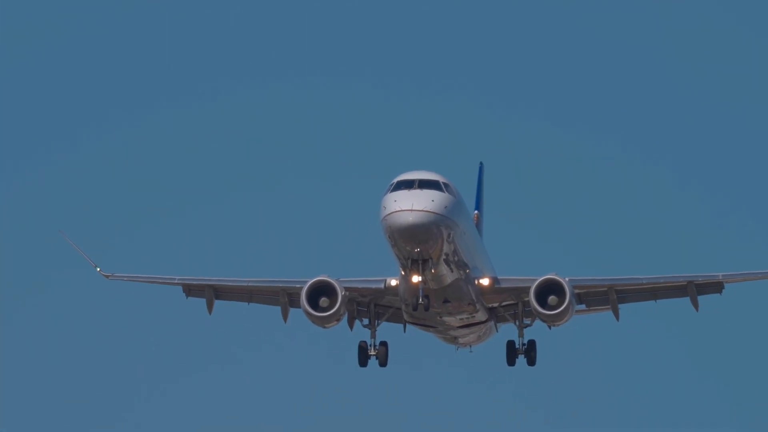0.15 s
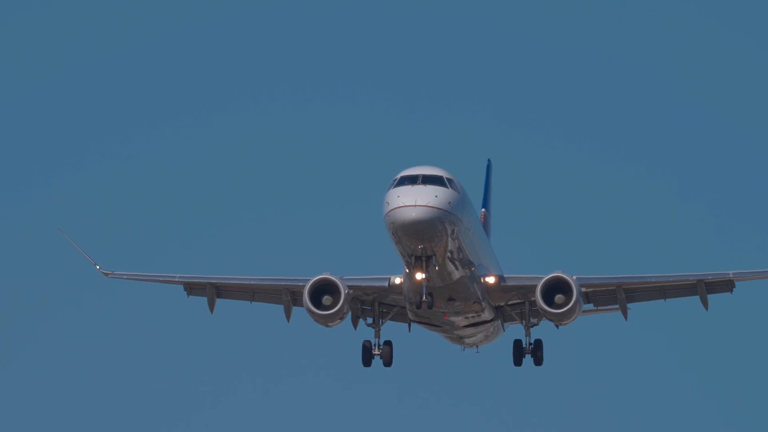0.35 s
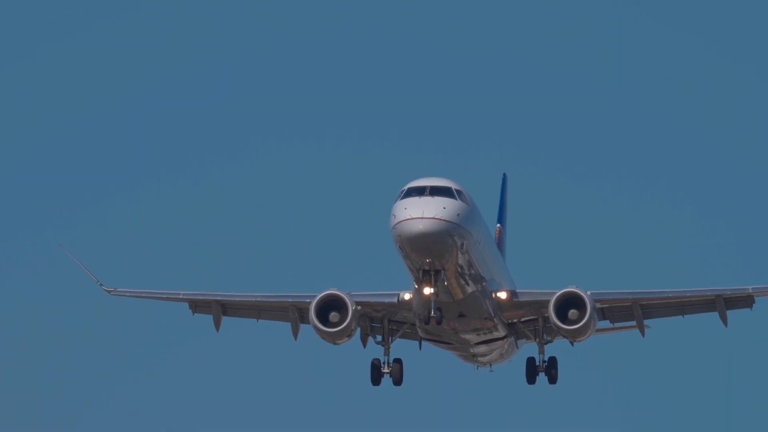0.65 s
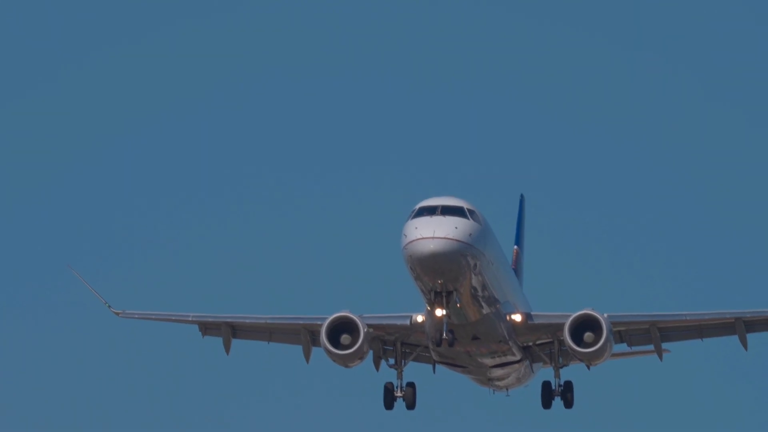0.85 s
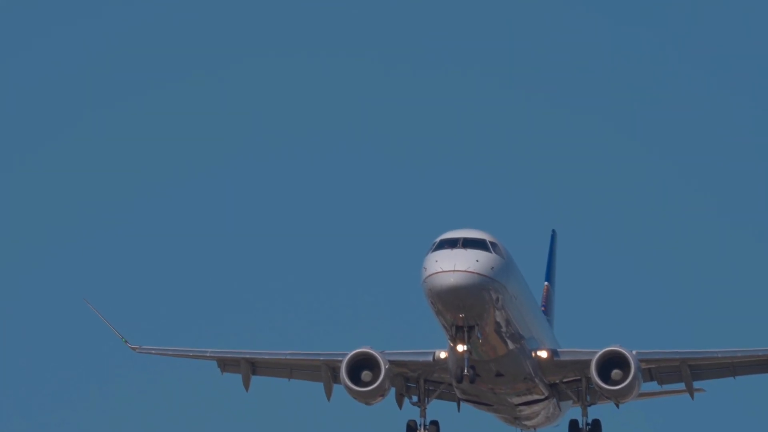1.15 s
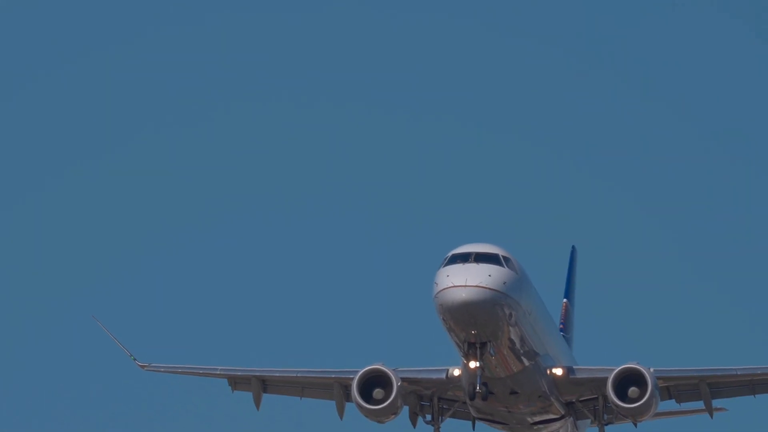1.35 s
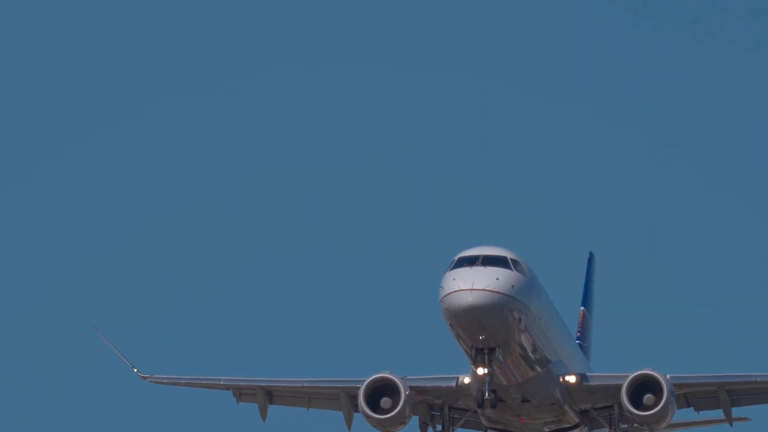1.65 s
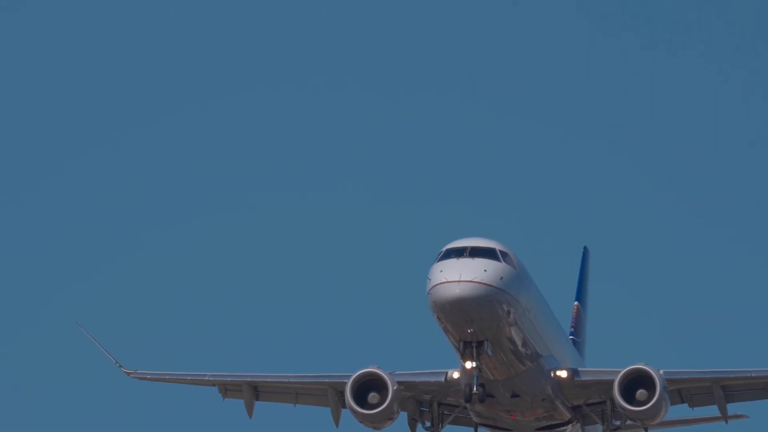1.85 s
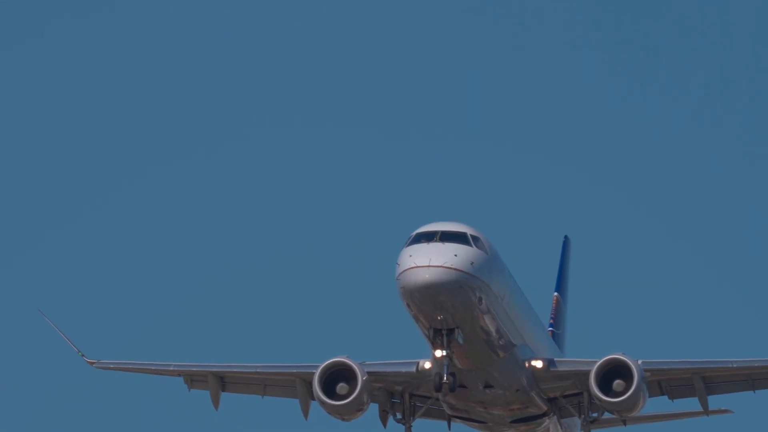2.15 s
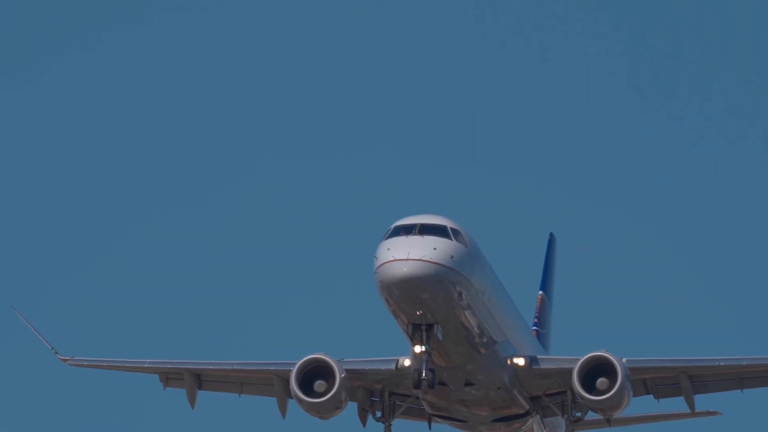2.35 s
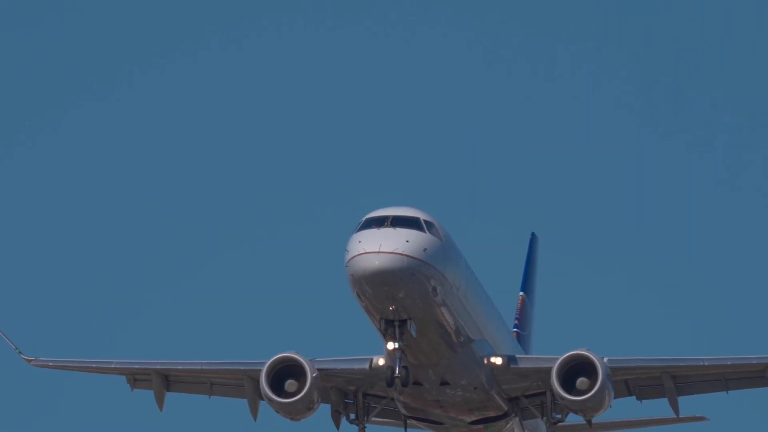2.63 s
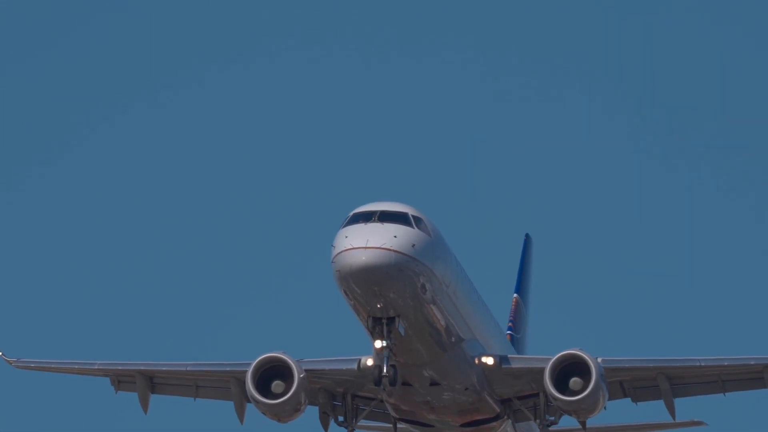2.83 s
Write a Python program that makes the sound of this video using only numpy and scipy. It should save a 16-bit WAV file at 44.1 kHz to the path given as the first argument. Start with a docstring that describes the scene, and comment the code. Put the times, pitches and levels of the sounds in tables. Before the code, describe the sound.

A jet airliner approaches outdoors, its soft broad roar starting wide and rightward. Low wind rumble buffets the microphone throughout; gusts flutter, thump and pop from 0.5 to 1.5 s, with sharp tearing near 1.3 s. A faint high hiss fades. Wind eases, with a brief gust near 1.9 s. From 2.1 s fan rush and wavering, slightly rising whine swell, more central, loudest at the end without passing.

```python
"""A jet airliner nears head-on to land: broad roar, growing fan rush, thin rising whine.
Roar and rush are shaped, patchy stereo noise; swells are sliding noise bands; whine and partials are wavering sines.
Gusts buffet the microphone: lumpy noise for rumble, flutter, bluster and tearing; single pulses for thumps and pops.
A faint high hiss, like wind in grass, is patchy noise that dies away over an even noise floor."""
import sys
import numpy as np
from scipy import signal
from scipy.fft import rfft, irfft, next_fast_len
from scipy.io import wavfile
from scipy.ndimage import uniform_filter1d, map_coordinates

SR = 44100
rng = np.random.default_rng(int(sys.argv[2]) if len(sys.argv) > 2 else 0)


def inscribe(sig):
    """Save sig as 16-bit PCM at rate SR to the path in sys.argv[1].

    A 1-D sig is mono; a 2-D sig holds one channel per row.
    Samples are clipped to [-1, 1] before scaling.
    """
    pcm = np.round(np.clip(np.atleast_2d(sig).T, -1, 1) * 32767)
    wavfile.write(sys.argv[1], SR, pcm.astype(np.int16))


N = 131859  # samples

# All spectra are relative: the noise is scaled to rms 1 before its level is applied.
# Jet levels are ahead of pan, width and balance.
# approach: t/s, then roar, fan rush, treble level/dB ahead of the trims
APPROACH_DB = [(0.0, -47.5, -53, -64), (0.61, -47, -52.5, -63), (0.7, -49.5, -50.5, -64),
               (1.15, -46.5, -50, -63), (1.26, -48, -49, -56.5), (1.38, -48.5, -48.5, -60.5),
               (1.56, -49, -46.5, -57.5), (1.78, -46.5, -46, -59.5), (1.95, -45.5, -48, -56.5),
               (2.12, -47, -42.5, -52.5), (2.36, -47.5, -39, -50), (2.5, -44.5, -42.5, -51.5),
               (2.8, -44, -40, -53), (2.9, -46, -37, -50), (2.99, -40, -43, -50.5)]
ROAR_TRIM_DB, RUSH_TRIM_DB, TREBLE_TRIM_DB = 3, 1.46, 1
# lower body of the roar: t/s, level/dB
BODY_LEVEL_DB = [(0, -53.5), (.35, -55.5), (1.0, -47.5), (1.55, -47.5), (1.85, -52.5), (2.05, -49),
                 (2.14, -43.5), (2.25, -49), (2.42, -48.5), (2.6, -47), (2.99, -61)]
# jet noise spectra: f/Hz, density/dB
ROAR_SPECTRUM_DB = [(40, -21), (150, -7.5), (400, -21.5), (540, -3.5), (720, -5.5), (980, 1.5),
                    (1150, -2.5), (1400, -2.5), (1750, -11.5), (2400, -26.5), (5000, -65)]
BODY_SPECTRUM_DB = [(150, -11.5), (330, -5), (450, -2.5), (620, -2.5), (740, 2), (900, -2), (1300, -37.5),
                    (3000, -64.5)]
RUSH_SPECTRUM_DB = [(700, -7.5), (1150, -7), (1450, 2.5), (1700, 0), (1900, 2.5), (2150, -1.5),
                    (2500, -4.5), (2900, -9.5), (3600, -60.5), (6000, -81)]
TREBLE_SPECTRUM_DB = [(1500, -36.5), (2300, -0.5), (2800, 3.5), (3400, 2.5), (4000, -6), (4700, -12.5),
                      (5500, -30.5), (7000, -70), (10000, -62.5)]
# jet noise ahead of the width: f/Hz, left-right correlation/1
JET_ALIKE = [(100, 0.57), (280, 0.25), (680, 0.85), (1100, 0.65), (1800, 0.85), (2900, 0.24), (5000, 0.62)]
# jet, on top of the pan: f/Hz, right over left/dB
JET_BALANCE_DB = [(150, -5), (420, -2), (700, 0), (1100, 2), (1800, 1), (2900, 0), (5000, 1.5)]
# jet between ports: f/Hz, left lead/rad
JET_LEAD_RAD = [(300, 0.43), (1200, -0.92), (1800, -0.64), (2400, -0.57), (3200, -1.2), (5000, -0.12)]
# whole jet: t/s, right over left/dB, side gain/dB; direct sound outgrows scattered
BEARING_DB = [(0, 5.5, 3.5), (.7, 3.5, 3.5), (1.5, 3, 0), (2.2, 2, -3), (2.99, 1.5, -9.5)]
# fan noise swells: t/s, half length/s, centre f/Hz, slide/(Hz/s), half width/Hz, level/dB
SWELLS = [(1.57, 0.16, 1920, 1, 139, -47), (2.451, 0.2, 1859, -300, 80.4, -43),
          (2.322, 0.1, 2490, -1, 220, -51), (2.349, .15, 1120, -200, 110.6, -47),
          (2.562, 0.18, 1415, 2.5, 201.5, -46), (2.86, 0.21, 1526, -300, 138.6, -41),
          (2.88, 0.18, 2450, 1.5, 188.5, -48)]
# blade tone pitch, engines spooling up slightly: t/s, f/Hz
BLADE_HZ = [(0, 2154), (.3, 2150), (.65, 2143), (1.15, 2151), (1.5, 2182), (1.8, 2207), (2.2, 2227),
            (2.6, 2241), (2.99, 2257)]
# blade tone in moving air: t/s, level/dB ahead of flicker
BLADE_LEVEL_DB = [(0, -59), (.3, -60), (.48, -63.5), (.64, -57), (.87, -54), (1.02, -60), (1.2, -55),
                  (1.42, -69), (1.55, -53.5), (1.8, -54.5), (2.05, -70.5), (2.22, -47), (2.55, -61),
                  (2.7, -53.5), (2.86, -44), (2.99, -46.5)]
OCTAVE_RE_BLADE_DB, BLADE_WANDER_HZ = -30, 1.9
# lower engine tone: t/s, level/dB ahead of flicker
LOW_TONE_LEVEL_DB = [(0, -65), (1.5, -58), (1.8, -56), (2.25, -60.5), (2.5, -45), (2.7, -52), (2.99, -53)]
LOW_TONE_HZ, LOW_TONE_WANDER_HZ, TONE_FLICKER_DB = 1270, 4, 1.1
# fan partials: f/Hz, level re untrimmed rush/dB
PARTIALS = [(1878, -16.5), (1985, -18.5), (1594, -21), (2379, -26), (2925, -31), (3129, -34), (3209, -34)]
PARTIAL_WANDER_RATIO, PARTIAL_FLICKER_DB = .003, 1

# hiss: t/s, level/dB ahead of trim and balance
HISS_LEVEL_DB = [(0, -69.5), (.1, -78), (.57, -77.5), (.82, -69), (1.05, -73.5), (1.48, -79), (1.7, -83.5),
                 (2.5, -88), (2.99, -102)]
# hiss spectrum: f/Hz, density/dB
HISS_SPECTRUM_DB = [(2000, -15), (3500, 4), (4400, 8.5), (5200, 7.5), (6000, 2), (7000, 0), (8000, -9.5),
                    (9000, -18.5), (11000, -31.5), (15000, -41)]
# hiss between ports: f/Hz, right over left/dB
HISS_BALANCE_DB = [(3500, 13), (4500, 0), (5500, 8), (7000, 10.5), (9000, 13), (12000, -2)]
# hiss between ports: f/Hz, left lead/rad
HISS_LEAD_RAD = [(2500, 4), (4000, 3.4), (5500, 1.6), (8000, 1.3)]
HISS_TRIM_DB, FLOOR_DB = 5.5, -85

# Wind levels, thumps excepted, are ahead of the port balance.
# rumble: t/s, level/dB ahead of trim
RUMBLE_LEVEL_DB = [(0.0, -36), (0.04, -50.5), (0.11, -34), (0.19, -45.5), (.4, -42.5), (0.8, -36.5),
                   (0.99, -41.5), (1.17, -35.5), (1.22, -42), (1.42, -35.5), (1.48, -45), (1.66, -41),
                   (1.8, -47), (1.94, -40.5), (2.04, -42), (2.42, -41), (2.56, -51.5), (2.76, -42),
                   (2.86, -44.5), (2.99, -44.5)]
# gusts: t/s, flutter level/dB ahead of trim
GUST_DB = [(0, -52.5), (.36, -62), (.5, -42), (.55, -48.5), (.6, -44), (.72, -39.5), (.78, -38.5),
           (.85, -37), (.94, -41), (1.02, -45), (1.12, -40), (1.18, -40), (1.23, -41.5), (1.28, -40.5),
           (1.36, -42.5), (1.41, -45), (1.47, -46), (1.56, -47.5), (1.81, -61.5), (1.87, -47.5),
           (1.93, -48), (2.01, -59), (2.14, -56), (2.26, -46), (2.32, -59.5), (2.4, -44.5), (2.52, -63.5),
           (2.99, -63.5)]
RUMBLE_TRIM_DB, FLUTTER_TRIM_DB = 0.5, 2.5
# bluster level at a strong gust, and its dB per dB of gust
STRONG_GUST_DB, BLUSTER_DB, BLUSTER_DB_PER_DB = -41, -42, 1.44
# tearing at the ports: t/s, level/dB, flow speed re nominal/1
TEARS = [(.54, -65, 0.72), (.6, -46, 0.82), (.7, -42, 0.74), (.79, -36.5, 0.83), (.85, -37.5, 0.91),
         (1.0, -54.5, .7), (1.11, -40, 0.71), (1.2, -39.5, 0.85), (1.24, -41.5, 0.81), (1.27, -31, 0.91),
         (1.295, -41, 1.02), (1.342, -28, 1.12), (1.39, -47.5, 1.17), (1.5, -73, .8), (1.85, -55, .65),
         (1.92, -42.5, .8), (1.97, -62.5, 0.72)]
# wind spectra: f/Hz, density/dB (tearing: at nominal flow speed)
RUMBLE_SPECTRUM_DB = [(8, -8), (25, -2), (45, -4), (80, -1.5), (120, -7), (180, -10), (300, -23),
                      (800, -82)]
FLUTTER_SPECTRUM_DB = [(40, -26.5), (100, -9), (170, -4.5), (240, -4), (330, -5.5), (500, -24), (1100, -40),
                       (3000, -77)]
BLUSTER_SPECTRUM_DB = [(120, -17.5), (220, 1), (310, -2.5), (420, -6), (600, -5), (1000, -10.5),
                       (3000, -76)]
TEARING_SPECTRUM_DB = [(200, -21.5), (400, -1), (540, 6), (720, -3.5), (950, -11), (1400, -19.5),
                       (3000, -40.5), (6000, -91.5)]
# wind at the ports: f/Hz, left-right correlation/1
WIND_ALIKE = [(30, .97), (80, .9), (160, .66), (280, .45), (500, .42), (1200, .2)]
# wind at the ports: f/Hz, right over left/dB
WIND_BALANCE_DB = [(60, -1), (180, 1.5), (350, 0.4), (650, 7), (1500, 1.5)]
# eddies reach the left port first: f/Hz, left lead/rad
WIND_LEAD_RAD = [(30, 0), (100, .1), (200, .55), (300, 1.1), (500, 2.1), (800, 2.9), (1200, 3.3)]
# single eddies on the microphone: t/s, peak/dB, half length/s
THUMPS = [(.113, -30, 0.003), (0.28, -32, 0.0016), (0.59, -24.5, 0.0016), (0.669, -30, 0.0045),
          (0.777, -27.5, 0.0016), (0.833, -26, 0.0015), (1.15, -24.5, .002), (1.181, -34, 0.0054),
          (1.393, -41, 0.0081), (1.427, -28.5, 0.0033), (1.472, -29.5, 0.0013), (1.927, -41, .0016),
          (1.941, -31, 0.0028), (2.269, -34, .0028), (2.384, -34, 0.0019), (2.4, -34, 0.0032),
          (2.783, -29, 0.0015)]
# vortex cores crossing the ports: t/s, peak suction/dB
POPS = [(.62, -24.5), (0.737, -24.5), (.747, -20), (0.794, -27.5), (0.819, -27.5), (.833, -28.5),
        (.876, -24), (0.887, -27.5), (1.111, -23), (1.126, -19), (1.361, -18)]
POP_HALF_S = 0.00092

TOP_HZ, FADE_S = 14500, .002


def amp(db):
    """Decibels to gain."""
    return 10 ** (np.asarray(db) / 20)


def unit(x):
    """Scale to rms 1."""
    return x / np.sqrt(np.mean(x ** 2) + 1e-20)


def along(points, hz):
    """Interpolate (Hz, value) points on a log frequency axis."""
    f, v = np.transpose(points)
    return np.interp(np.log(hz + 1), np.log(f + 1), v)


def clock():
    """Time of each sample, s."""
    return np.arange(N) / SR


def curves(rows):
    """One value per sample for each column after the time."""
    s, *cols = np.transpose(rows)
    return [np.interp(clock(), s, c) for c in cols]


def wobble(knots_per_s):
    """Smooth random curve through Gaussian knots."""
    return map_coordinates(rng.standard_normal(1024), [clock() * knots_per_s + 2], mode="wrap")


def phase_of(hz):
    """Integrate frequency to phase, rad."""
    return 2 * np.pi * np.cumsum(hz) / SR


def filtered(x, response):
    """Apply a complex response of frequency."""
    m = next_fast_len(N + SR // 2)
    return irfft(rfft(x, m) * response(np.fft.rfftfreq(m, 1 / SR)), m)[..., :N]


def paired(pair, shape, alike):
    """Mix two unrelated noises as mid and side to rms-1 stereo of given spectrum and correlation."""
    def mid_side_gains(hz):
        turn = np.arccos(np.clip(along(alike, hz), -1, 1)) / 2
        return shape(hz) * np.array([np.cos(turn), np.sin(turn)])

    mid, side = filtered(pair, mid_side_gains)
    return unit(np.array([mid + side, mid - side]))


def patchy_noise(spectrum, alike, patchy_db):
    """Stereo noise with smooth random gain patches over time and frequency."""
    z = signal.stft(rng.standard_normal((2, N)), nperseg=1024)[2]
    field = uniform_filter1d(rng.standard_normal(z.shape[1:]), size=6, axis=0)  # frequency bins
    field = uniform_filter1d(field, size=12, axis=1)  # frames
    pair = signal.istft(z * amp(patchy_db * unit(field)), nperseg=1024)[1][:, :N]
    return paired(pair, lambda hz: amp(along(spectrum, hz)), alike)


def eddies(spectrum, knots_per_s, lumpy_db):
    """Turbulent pressure: noise in quick random lumps."""
    pair = rng.standard_normal((2, N)) * amp(lumpy_db * np.tanh(wobble(knots_per_s)))
    return paired(pair, lambda hz: amp(along(spectrum, hz)), WIND_ALIKE)


def rescaled(x, speed, anchor_s=0):
    """Play noise at a changing speed so its spectrum slides; on time at the anchor."""
    position_s = np.cumsum(speed) / SR
    position_s = position_s + anchor_s - np.interp(anchor_s, clock(), position_s)
    return unit(np.array([map_coordinates(side, [position_s * SR], mode="mirror") for side in x]))


def placed(x, balance_db, lead_rad):
    """Set level and phase difference between the ports."""
    side = np.array([[-.5], [.5]])
    return filtered(x, lambda hz: amp(side * along(balance_db, hz)) * np.exp(-1j * side * along(lead_rad, hz)))


def jet_noise():
    """Airframe and exhaust roar, its lower body, fan rush and treble: noise bands on the approach curves."""
    roar_db, rush_db, treble_db = curves(APPROACH_DB)
    body_db, = curves(BODY_LEVEL_DB)
    roar_gain = amp(roar_db + ROAR_TRIM_DB + 0.74 * wobble(14))
    roar = roar_gain * patchy_noise(ROAR_SPECTRUM_DB, JET_ALIKE, patchy_db=2.7)
    body_gain = amp(body_db + 0.32 * wobble(4.7))
    body = body_gain * patchy_noise(BODY_SPECTRUM_DB, JET_ALIKE, patchy_db=0.4)
    fan_gain = amp(rush_db + RUSH_TRIM_DB + 0.31 * wobble(13.0))
    fans = fan_gain * patchy_noise(RUSH_SPECTRUM_DB, JET_ALIKE, patchy_db=0.4)
    treble_gain = amp(treble_db + TREBLE_TRIM_DB + 0.64 * wobble(30))
    treble = treble_gain * patchy_noise(TREBLE_SPECTRUM_DB, JET_ALIKE, patchy_db=2.5)
    return roar + body + fans + treble


def jet_tones():
    """Blade tone, its octave and a lower engine tone: sines with wandering pitch, flickering in the air."""
    blade_hz, = curves(BLADE_HZ)
    blade_db, = curves(BLADE_LEVEL_DB)
    low_db, = curves(LOW_TONE_LEVEL_DB)
    blade_phase = phase_of(blade_hz + BLADE_WANDER_HZ * wobble(40))
    low_phase = phase_of(LOW_TONE_HZ + LOW_TONE_WANDER_HZ * wobble(35))

    def tone(phase, rms_db):
        return np.sqrt(2) * amp(rms_db + TONE_FLICKER_DB * wobble(22.53)) * np.sin(phase)

    blade = tone(blade_phase, blade_db)
    octave = tone(2 * blade_phase, blade_db + OCTAVE_RE_BLADE_DB)
    return blade + octave + tone(low_phase, low_db)


def jet_partials():
    """Weak engine partials: wavering sines that follow the fan rush level."""
    rush_db = curves(APPROACH_DB)[1]
    out = np.zeros(N)
    for hz, db in PARTIALS:
        phase = phase_of(hz * (1 + PARTIAL_WANDER_RATIO * wobble(25)))
        flicker_db = PARTIAL_FLICKER_DB * np.tanh(wobble(11.0))
        out += np.sqrt(2) * amp(rush_db + db + flicker_db) * np.sin(phase)
    return out


def hiss():
    """Faint high rustle, mostly to the right, over an even white noise floor."""
    level_db, = curves(HISS_LEVEL_DB)
    gain = amp(level_db + HISS_TRIM_DB + 0.58 * wobble(60))
    rustle = gain * patchy_noise(HISS_SPECTRUM_DB, [(5000, 0.5)], patchy_db=3.0)
    return placed(rustle, HISS_BALANCE_DB, HISS_LEAD_RAD) + amp(FLOOR_DB) * rng.standard_normal((2, N))


def rumble():
    """Low turbulent pressure on the microphone."""
    level_db, = curves(RUMBLE_LEVEL_DB)
    return amp(level_db + RUMBLE_TRIM_DB) * eddies(RUMBLE_SPECTRUM_DB, knots_per_s=87, lumpy_db=1.0)


def flutter():
    """Lumpy turbulent pressure that follows the gusts."""
    gust_db, = curves(GUST_DB)
    return amp(gust_db + FLUTTER_TRIM_DB) * eddies(FLUTTER_SPECTRUM_DB, knots_per_s=110, lumpy_db=3.5)


def bluster():
    """Higher turbulence that grows faster than the gust."""
    gust_db, = curves(GUST_DB)
    level_db = BLUSTER_DB + BLUSTER_DB_PER_DB * (gust_db - STRONG_GUST_DB)
    return amp(level_db) * eddies(BLUSTER_SPECTRUM_DB, knots_per_s=94, lumpy_db=3.5)


def thumps():
    """Each passing eddy is one push and pull of pressure."""
    out = np.zeros(N)
    for s, db, half_s in THUMPS:
        u = (clock() - s) / half_s
        out -= amp(db) * u * np.exp((1 - u ** 2) / 2)
    return out


def tearing():
    """Wind tears at the ports; its spectrum moves up with flow speed."""
    level_db, speed = curves(TEARS)
    turbulence = eddies(TEARING_SPECTRUM_DB, knots_per_s=190, lumpy_db=4)
    return amp(level_db) * rescaled(turbulence, speed)


def pops():
    """Each vortex core is one sharp pressure dip between two soft shoulders."""
    out = np.zeros(N)
    for s, db in POPS:
        u = (clock() - s) / POP_HALF_S
        out -= amp(db) * (1 - u ** 2) / (1 + u ** 2) ** 2
    return out


def jet_swells():
    """Narrow bands of fan noise swell, slide through the moving air and fade."""
    out = np.zeros((2, N))
    for s, half_s, centre_hz, slide_hz_per_s, width_hz, db in SWELLS:
        bell = lambda hz: np.exp(-((hz - centre_hz) / width_hz) ** 2 / 2)
        band = paired(rng.standard_normal((2, N)), bell, JET_ALIKE)
        t = clock() - s
        envelope = amp(db) * np.exp(-(t / half_s) ** 2 / 2)
        out += envelope * rescaled(band, 1 + slide_hz_per_s * t / centre_hz, anchor_s=s)
    return out


def jet():
    """Whole aircraft: wide and to the right at first, then narrower and more central."""
    left, right = jet_noise() + jet_tones() + jet_partials() + jet_swells()
    pan_db, width_db = curves(BEARING_DB)
    mid = (left + right) / 2
    side = amp(width_db) * (left - right) / 2
    pan_gain = amp(np.array([-pan_db, pan_db]) / 2)
    return placed(np.array([mid + side, mid - side]) * pan_gain, JET_BALANCE_DB, JET_LEAD_RAD)


def wind():
    """All port turbulence, with level and phase differences between the ports."""
    pressure = rumble() + flutter() + bluster() + tearing() + pops()
    return placed(pressure, WIND_BALANCE_DB, WIND_LEAD_RAD)


def scene():
    """Jet and hiss in the open; wind and thumps on the microphone itself."""
    return jet() + hiss() + wind() + thumps()


def record(dry):
    """Ease both ends, then low-pass at the band limit."""
    to_end_s = np.minimum(clock(), clock()[::-1])
    ease = np.sin(np.pi / 2 * np.clip(to_end_s / FADE_S, 0, 1)) ** 2
    low_pass = signal.ellip(8, .1, 70, TOP_HZ, fs=SR, output="sos")  # order, ripple/dB, stopband/dB
    return signal.sosfilt(low_pass, dry * ease)


dry = scene()
out = record(dry)
inscribe(out)
```